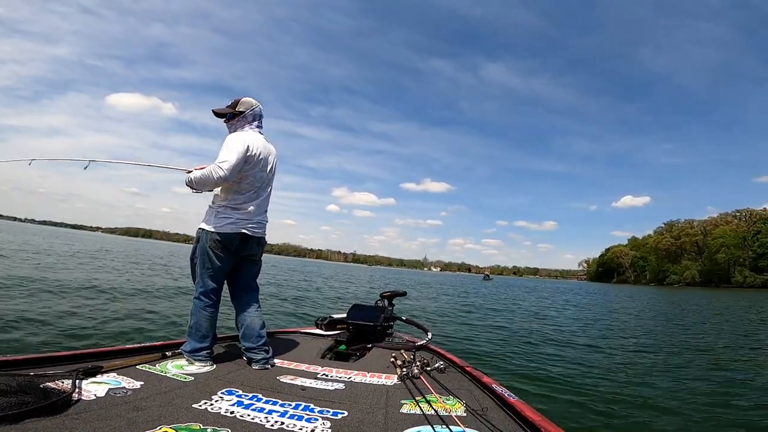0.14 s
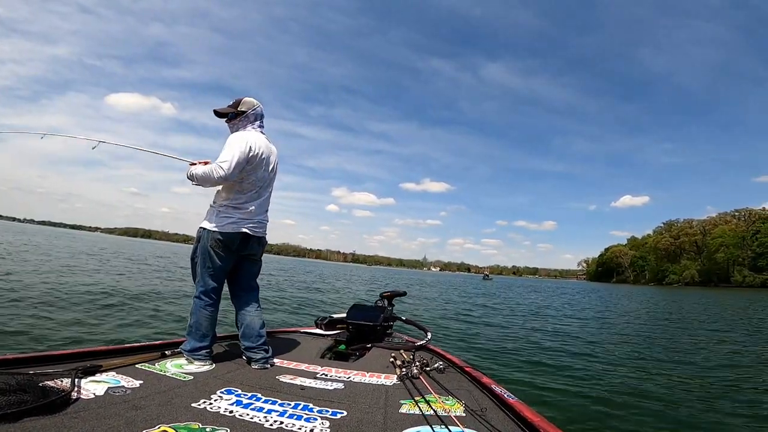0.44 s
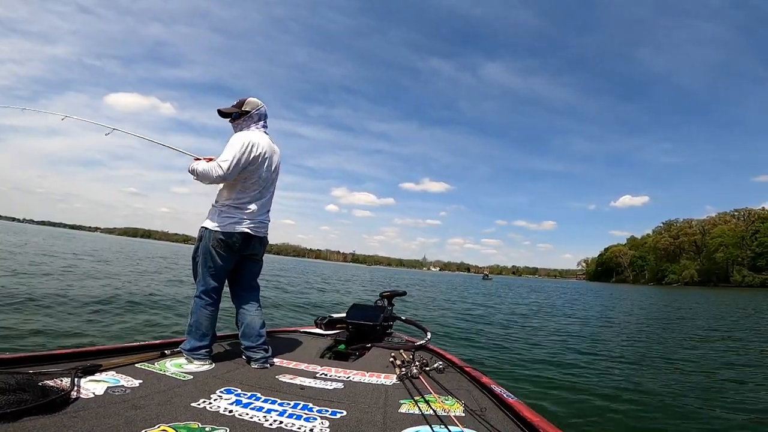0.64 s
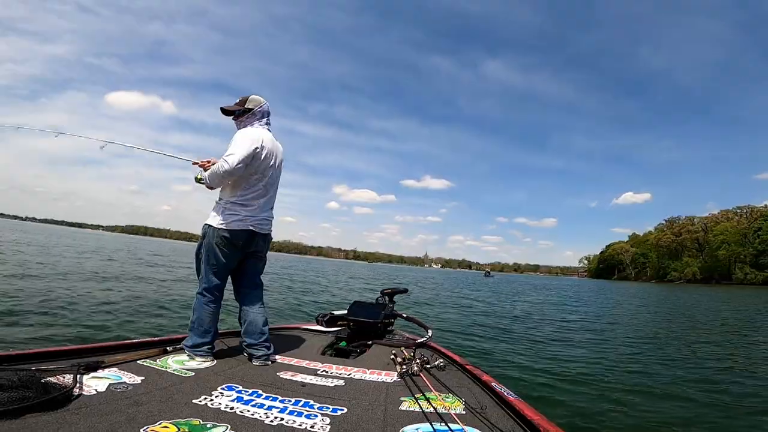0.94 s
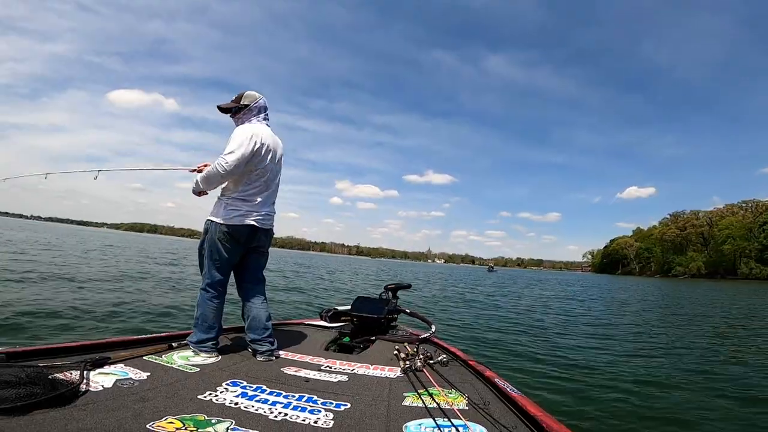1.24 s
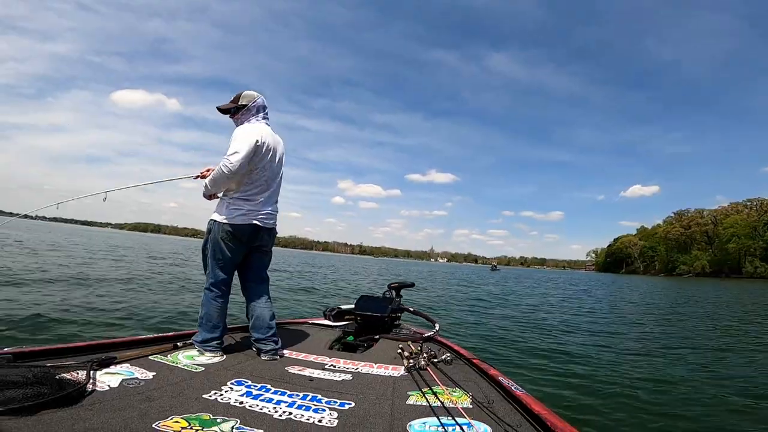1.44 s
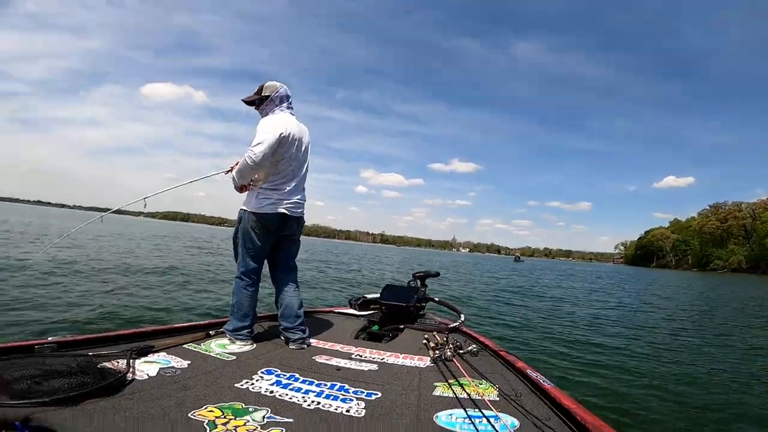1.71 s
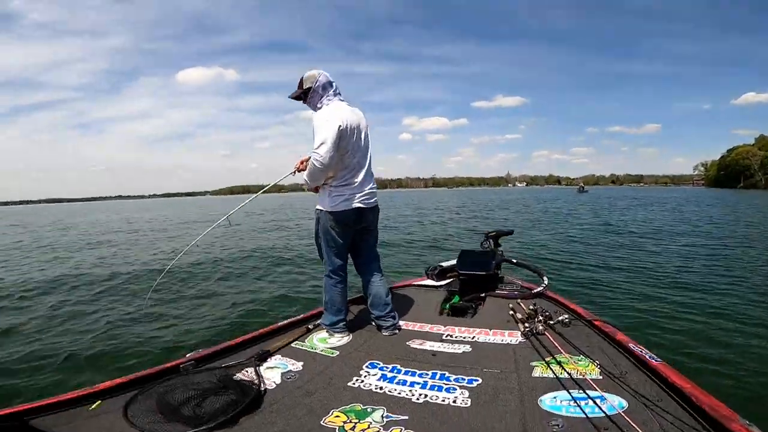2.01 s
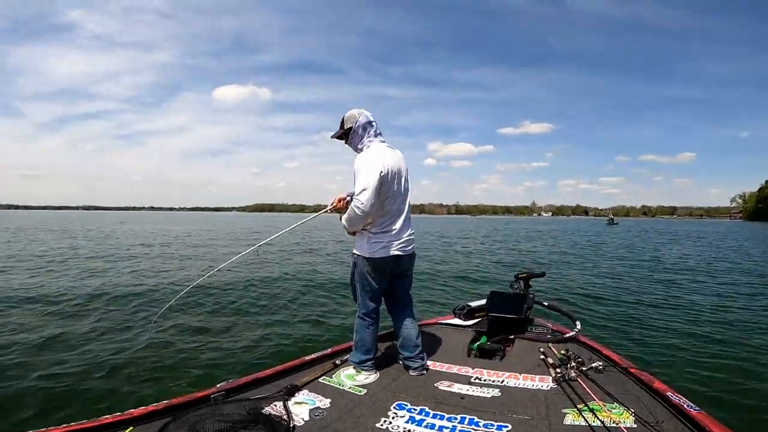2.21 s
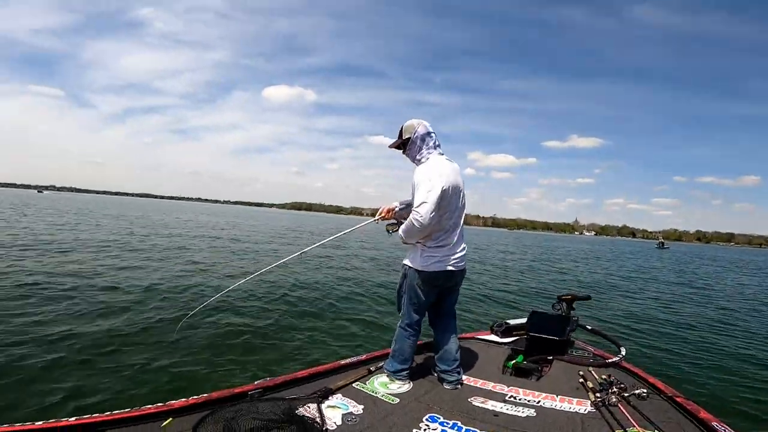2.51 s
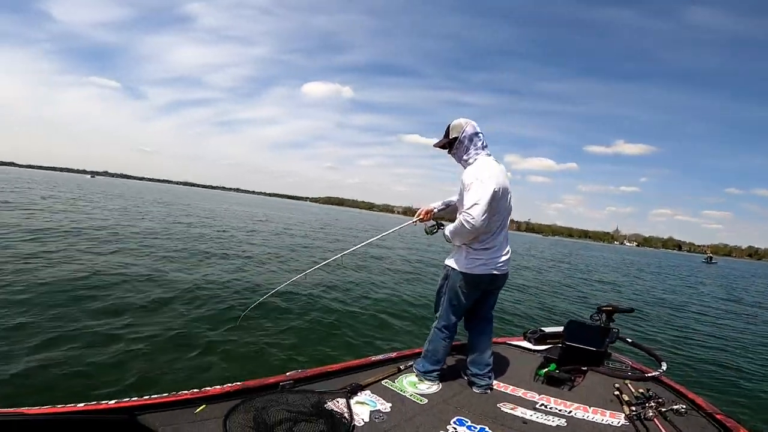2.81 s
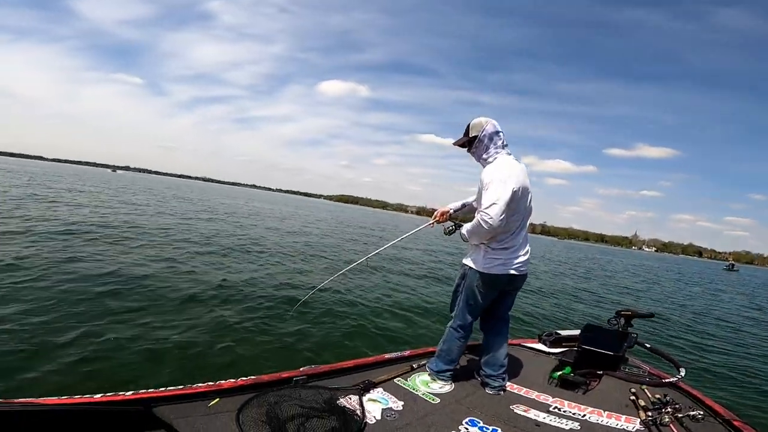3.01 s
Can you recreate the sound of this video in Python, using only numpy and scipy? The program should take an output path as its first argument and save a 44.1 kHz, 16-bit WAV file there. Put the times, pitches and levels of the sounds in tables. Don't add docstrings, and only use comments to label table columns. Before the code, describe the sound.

Low electric motor hum with soft water wash, outdoors on a boat; midway, dull deck thuds and a short clattering scrape with knocks, then stronger low wind rumble on the onboard microphone.

```python
import sys
import numpy as np
from scipy import signal
from scipy.fft import rfft, irfft, next_fast_len
from scipy.io import wavfile
from scipy.ndimage import uniform_filter1d, map_coordinates

SR = 44100
rng = np.random.default_rng(int(sys.argv[2]) if len(sys.argv) > 2 else 0)


def inscribe(sig):
    pcm = np.round(np.clip(np.atleast_2d(sig).T, -1, 1) * 32767)
    wavfile.write(sys.argv[1], SR, pcm.astype(np.int16))


def volts_from_decibels(level):
    exponent = np.asarray(level, float) / 20
    return 10 ** exponent


N = 138915
SWELL_DB, PATCH_DB = 0.8, 1.5


def unit(x):
    return x / np.sqrt(np.mean(x ** 2) + 1e-20)


def along(points, hz):
    f, value = np.transpose(points)
    return np.interp(np.log(hz + 1), np.log(f + 1), value)


def curve(rows):
    return np.interp(np.arange(N) / SR, *np.transpose(rows))


def wobble(rate_hz):
    return map_coordinates(rng.standard_normal(400), [np.arange(N) * rate_hz / SR])


def filtered(x, response):
    m = next_fast_len(len(x) + 8192)
    return irfft(rfft(x, m) * response(np.fft.rfftfreq(m, 1 / SR)), m)[:len(x)]


def resonances(table):
    def response(f):
        total = 0
        for k, (hz, width, db) in enumerate(table):
            damping = 1j * f * width
            total = total + (-1) ** k * volts_from_decibels(db) * damping / (hz * hz - f * f + damping)
        return total
    return response


def rush(spectrum, patchy_db):
    z = signal.stft(rng.standard_normal(N), nperseg=512)[2]
    field = uniform_filter1d(rng.standard_normal(z.shape), size=5, axis=0)
    field = uniform_filter1d(field, size=10, axis=1)
    x = signal.istft(z * volts_from_decibels(patchy_db * unit(field)), nperseg=512)[1][:N]
    top_hz = spectrum[-1][0]
    return unit(filtered(x, lambda hz: volts_from_decibels(along(spectrum, hz) - 10 * np.log2(np.maximum(hz / top_hz, 1)))))


def add(out, start_s, x):
    out[round(start_s * SR):][:len(x)] += x


def ring(hz, t60, attack, rise=0):
    t = np.arange(SR // 5) / SR
    tone = np.sin(2 * np.pi * hz * t * (1 + rise * np.minimum(t / t60, 1)))
    return tone * volts_from_decibels(-60 * t / t60) * (1 - np.exp(-t / attack))


def swell_db(t, rise_t60, fall_t60):
    return -60 * np.where(t < 0, -t / rise_t60, t / fall_t60)


# pitch_hz, rms_db
HUM_LINES = [(139.6, -42.5), (279.7, -40)]
# time_s, gain_db
MOTOR_LOAD = [(0, -1.5), (.35, 1), (.7, 1), (.9, -2), (1.15, -2), (1.5, 0), (2.0, -4.5), (2.2, 3.5),
              (2.5, 1.5), (3.15, 1)]
# pitch_hz, width_hz, level_db
HULL_MODES = [(141.8, 21.8, -0.5), (191, 21.6, 0.5), (261.6, 43.3, -1.5), (341.3, 24.1, 0), (403, 41, -8.5)]
# pitch_hz, width_hz, level_db
HULL_PANELS = [
    [(772.5, 54, -9), (1024, 170, -17), (1270, 150, -18), (1630, 220, -25.5)],
    [(597, 110, -11), (860, 240, -18.5), (1316, 250, -19.5)],
]


def motor():
    drift, sway_db, brush_share, hull_db = 0.0007, 1, 0.21, -34
    swing_s, swing_lasts_s = 1.85, 0.23
    turn = 2 * np.pi * np.cumsum(1 + drift * wobble(2.2)) / SR
    lines = np.zeros(N)
    for hz, db in HUM_LINES:
        level_db = db + curve(MOTOR_LOAD) + sway_db * wobble(5.1)
        lines += np.sqrt(2) * volts_from_decibels(level_db) * np.sin(hz * turn)
    brush = rng.standard_normal(N) * (1 + brush_share * np.sin(HUM_LINES[0][0] * turn))

    def through_hull(panels):
        return filtered(brush, lambda f: resonances(HULL_MODES + panels)(f) / (1 + (f / 2200) ** 4))

    before, after = [through_hull(panels) for panels in HULL_PANELS]
    swung = np.clip((np.arange(N) / SR - swing_s) / swing_lasts_s + 0.5, 0, 1)
    hull = unit((1 - swung) * before + swung * after)
    return lines + volts_from_decibels(hull_db + SWELL_DB * wobble(4.28)) * hull


# peak_s, rise_t60_s, fall_t60_s, level_db, tilt_db_per_octave
RATTLE_EVENTS = [(1.754, .003, 0.13, -39, -2.5), (1.77, .03, 0.23, -44, -8),
                 (1.784, 0.047, .04, -41.5, 14.5), (1.802, 0.034, 0.073, -38, -25),
                 (1.851, .006, .04, -39, -14), (1.866, 0.017, 0.021, -34.5, -12),
                 (1.878, .006, 0.028, -44, -5), (1.926, 0.011, .04, -34, -16.5),
                 (1.992, 0.047, 0.06, -27.5, -6), (2.029, 0.011, .03, -22.5, -2.5),
                 (2.116, 0.023, 0.032, -22, -13), (2.387, .004, .03, -45, -22.5),
                 (2.567, .004, .03, -45, -28), (2.717, 0.0071, .03, -44.5, -11), (2.785, .02, .06, -45, -6),
                 (2.809, .004, .03, -39.5, -9), (2.834, .003, .02, -44.5, -5),
                 (2.847, .004, .08, -40.5, -12), (3.07, 0.027, .04, -40.5, -15),
                 (3.093, .009, 0.048, -44, -10)]
# pitch_hz, width_hz, level_db
MOUNT_MODES = [(1211, 90, -5), (1814, 110, -3), (2500, 150, -4), (3321, 200, 0), (4188, 280, -3),
               (4900, 260, -4),
               (6150, 790, -11), (8600, 1500, -20.5), (11000, 2400, -24), (13240, 1100, -30)]


def mount_rattle():
    contacts_per_s, contact_db = 2500, 4
    out, t = np.zeros(N + SR), np.arange(-SR // 20, SR // 8) / SR
    for peak_s, rise, fall, db, tilt_db in RATTLE_EVENTS:
        hits = rng.random(len(t)) < contacts_per_s / SR
        grit = hits * rng.standard_normal(len(t)) * volts_from_decibels(contact_db * rng.standard_normal(len(t)))
        scrape = 0.5 * rng.standard_normal(len(t))

        def colour(f):
            return resonances(MOUNT_MODES)(f) * volts_from_decibels(tilt_db * np.log2((f + 3300) / 6600))

        burst = filtered((unit(grit) + scrape) * volts_from_decibels(swell_db(t, rise, fall)), colour)
        peak_rms = np.sqrt(uniform_filter1d(burst ** 2, size=200).max())
        add(out, peak_s + t[0], volts_from_decibels(db - 5.5) * burst / peak_rms)
    return out[:N]


# peak_s, rise_t60_s, fall_t60_s, level_db
KNOCK_EVENTS = [
    (1.993, 0.016, 0.032, -32),
    (2.0293, 0.042, 0.044, -37),
    (2.116, 0.028, 0.015, -27.5),
]
# pitch_hz, level_db
KNOCK_MODES = [
    [(1210, 5), (1970, 4.5), (2422, -12), (2923, -5), (3418, -8), (3919, -17), (4414, -2), (4974, -8),
     (6045, -12)],
    [(1800, -1), (2500, -2), (3365, -5), (3849, -12), (4264, -21), (4996, -9), (5507, -11.5), (6099, -13),
     (6584, -17), (7553, -11), (8344, -15)],
    [(1217, 0), (1820, -7), (2013, -4), (2519, -5.5), (3327, -3), (3521, 0), (4183, -19), (4899, -17.5),
     (5932, -17)],
]
# start_s, peak_db, pitch_hz, t60_s
CLINK_EVENTS = [(1.751, -50, 8500, .03), (1.753, -49, 4950, 0.047), (1.788, -54, 9800, 0.084),
                (1.79, -65, 12000, .08), (1.782, -59, 14430, 0.05), (1.79, -29.5, 2020, 0.045),
                (1.8, -63, 8060, 0.07)]


def mount_knocks():
    out, t = np.zeros(N + SR), np.arange(-SR // 20, SR // 8) / SR
    for (peak_s, rise, fall, db), modes in zip(KNOCK_EVENTS, KNOCK_MODES):
        tone = sum(volts_from_decibels(level) * np.sin(2 * np.pi * (hz * t + rng.random())) for hz, level in modes)
        add(out, peak_s + t[0], volts_from_decibels(db + swell_db(t, rise, fall)) * tone)
    for start_s, db, hz, t60 in CLINK_EVENTS:
        add(out, start_s, volts_from_decibels(db) * ring(hz, t60, attack=0.00082))
    return out[:N]


# start_s, peak_db, pitch_hz, t60_s
THUD_EVENTS = [(1.655, -15.5, 102, 0.17), (1.668, -11.5, 165.4, 0.16), (1.77, -14, 291, 0.066),
               (1.788, -6.5, 123, 0.065), (1.995, -16, 424, 0.091), (2.035, -14.5, 189, 0.063),
               (2.316, -9, 60.4, 0.11), (2.334, -6, 46, 0.064), (2.1, -14.5, 85, 0.077),
               (2.223, -20.5, 112, 0.024), (2.987, -15.5, 49.3, 0.12), (2.108, -27.5, 434, 0.12)]


def deck_thuds():
    out = np.zeros(N + SR)
    for start_s, db, hz, t60 in THUD_EVENTS:
        add(out, start_s, -volts_from_decibels(db) * ring(hz, t60, attack=0.34 / hz))
    return out[:N]


# start_s, peak_db, pitch_hz, crack_hz, crack_db, t60_s
TICK_EVENTS = [
    (0.3273, -46, 5930, 8800, -12.5, 0.0076),
    (0.585, -46, 5830, 8700, -9.5, 0.0072),
    (0.705, -50, 4950, 9660, 2, 0.027),
    (1.079, -72, 4555, 9150, 13.5, 0.012),
    (2.072, -60.5, 4080, 7900, 8, 0.019),
]


def reel_ticks():
    rebound_s, rebound_db, crack_width, crack_t60_s = 0.0011, 7.5, 0.12, 0.017
    out, t = np.zeros(N + SR), np.arange(SR // 5) / SR
    for start_s, db, hz, crack_hz, crack_db, t60 in TICK_EVENTS:
        crack_mode = resonances([(crack_hz, crack_width * crack_hz, 0)])
        for late_s, gain_db in [(0, 0), (rebound_s, rebound_db)]:
            crack = filtered(rng.standard_normal(len(t)) * volts_from_decibels(-60 * t / crack_t60_s), crack_mode)
            ping = ring(hz, t60, attack=0.00024)
            tick = ping + volts_from_decibels(crack_db) * crack / np.abs(crack).max()
            add(out, start_s + late_s, volts_from_decibels(db + gain_db) * tick)
    return out[:N]


def bubbles():
    count, rate_per_s, length = 1300, 400, 1024
    pitch_hz, pitch_spread, life_cycles, size_db = 950, 0.4, 6, 2
    when, size, pitch = rng.random(count), rng.exponential(1, count), rng.standard_normal(count)
    hz = (pitch_hz * np.exp(pitch_spread * np.clip(pitch, -2, 1.5)))[:, None]
    t = np.arange(length) / SR
    age = t * hz / life_cycles
    tone = np.sin(2 * np.pi * hz * t * (1 + 0.066 * age))
    grains = volts_from_decibels(size_db * np.minimum(size, 2))[:, None] * tone * age * np.exp(-3 * age)
    start = (when * count / rate_per_s * SR).astype(int)[:, None] + np.arange(length)
    return unit(np.bincount(start.ravel(), grains.ravel(), N)[:N])


# time_s, level_db
WASH_FLOW = [(0, -45), (.55, -44), (1.0, -39), (1.42, -42.5), (1.47, -35), (1.55, -42), (1.85, -35),
             (2.13, -41.5), (2.38, -48.5), (2.55, -44), (2.74, -41), (3.15, -51)]
# pitch_hz, level_db_per_hz
WASH_SPECTRUM = [(200, -27.5), (350, -5), (500, 0), (660, -10), (800, -5), (1260, -5.5), (1700, -22),
                 (2400, -34)]
# time_s, level_db
SPRAY_FLOW = [(0, -64.5), (.45, -65.5), (.9, -64.5), (1.45, -62), (1.7, -65.5), (1.77, -52.5), (1.95, -57),
              (2.14, -55.5), (2.2, -60.5), (2.6, -62), (2.8, -55.5), (2.95, -57), (3.15, -61.5)]
# pitch_hz, level_db_per_hz
SPRAY_SPECTRUM = [(900, -27), (1500, 9), (2600, 3.5), (4400, -5.5), (6500, -9.5), (9000, -17.5),
                  (16000, -32.5)]
# start_s, peak_db, pitch_hz, t60_s
PLOP_EVENTS = [(.312, -19.5, 852, 0.038), (1.431, -13.5, 890, 0.024), (1.46, -29, 793, 0.12),
               (1.795, -19.5, 500, 0.045), (1.7, -19.5, 640, .05), (1.876, -12, 623, 0.028),
               (1.625, -23.5, 1300, 0.039), (1.1, -24, 1140, 0.022), (0.72, -28.5, 790, 0.066),
               (2.037, -16.5, 787, 0.034), (1.2, -21.5, 340, 0.1), (2.2, -23, 850, 0.053),
               (1.99, -14.5, 650, 0.034), (2.116, -20, 660, 0.058), (2.712, -9, 602, 0.021)]


def water():
    bubble_db = -3
    plops = np.zeros(N + SR)
    for start_s, db, hz, t60 in PLOP_EVENTS:
        add(plops, start_s, volts_from_decibels(db) * ring(hz, t60, attack=0.0051, rise=0.062))
    wash_gain = volts_from_decibels(curve(WASH_FLOW) - 3.5 + SWELL_DB * wobble(8.62))
    wash = wash_gain * (rush(WASH_SPECTRUM, PATCH_DB) + volts_from_decibels(bubble_db) * bubbles())
    spray_gain = volts_from_decibels(curve(SPRAY_FLOW) + 4.5 + 0.92 * wobble(25.18))
    return wash + spray_gain * rush(SPRAY_SPECTRUM, PATCH_DB) + plops[:N]


# time_s, level_db
GUSTS = [(0, -32.5), (.13, -49), (.3, -45), (.59, -46), (.91, -40), (1.1, -50), (1.2, -40), (1.6, -40.5),
         (1.84, -31.5), (2.03, -27.5), (2.18, -33), (2.3, -24.5), (2.41, -29), (2.6, -30), (2.75, -31.5),
         (3.01, -27), (3.05, -37.5), (3.15, -44)]
# pitch_hz, level_db_per_hz
WIND_SPECTRUM = [(8.8, -11.5), (15, 2), (65, 2), (197, -10), (275, -9), (425, -28.5), (700, -22.5),
                 (910, -66.5), (1540, -120)]


def wind():
    lump_db = 1.5
    air = rush(WIND_SPECTRUM, PATCH_DB)
    power = uniform_filter1d(air ** 2, size=2200)
    even = air / (np.abs(power) + 0.05) ** 0.28
    return volts_from_decibels(curve(GUSTS) + 2.5) * unit(volts_from_decibels(lump_db * wobble(16)) * even)


# pitch_hz, level_db_per_hz
EDDY_SPECTRUM = [(120, -47), (200, -18), (374, -12), (727, -9.5), (1580, -15.5), (2420, -38.5),
                 (5200, -62.5)]


def eddies():
    return volts_from_decibels(curve(GUSTS) - 32 + 3 * wobble(20)) * rush(EDDY_SPECTRUM, 2 * PATCH_DB)


# pitch_hz, level_db
SIDE_SPREAD = [(100, -89), (300, -59), (700, -36), (1500, -22.5), (3000, -21), (6000, -15), (10000, -8.5)]


def scene():
    lean = -0.55
    mid = motor() + mount_rattle() + mount_knocks() + deck_thuds() + reel_ticks() + water() + wind()
    z = signal.stft(mid, nperseg=256)[2]
    random_phase = np.exp(2j * np.pi * rng.random(z.shape))
    apart = signal.istft(z * random_phase, nperseg=256)[1][:N]
    side = lean * mid + np.sqrt(1 - lean ** 2) * apart
    side = filtered(side, lambda hz: volts_from_decibels(along(SIDE_SPREAD, hz))) + eddies()
    return np.array([mid + side, mid - side])


# pitch_hz, level_db re block loudness
MID_FLOOR = [(3000, -80.5), (4500, -64.5), (6000, -57.5), (9000, -64), (14000, -63)]
# pitch_hz, level_db re block loudness
SIDE_FLOOR = [(200, -31.5), (600, -47.5), (1500, -45), (3000, -72.5), (6000, -73), (14000, -69.5)]
FLOOR_GROWTH = [1.2, .6]
FLOOR_SCATTER = [2.5, 3]


def drop_faint_bands(mid_side):
    lead, size = 968, 2048
    window = signal.windows.kaiser_bessel_derived(size, 4 * np.pi)
    hz, _, z = signal.stft(np.pad(mid_side, ((0, 0), (lead, 0))), SR, window=window, nperseg=size)
    power = np.abs(z) ** 2
    centre = np.minimum(np.arange(1025) // 24 * 24 + 12, 1024)
    mid_power = uniform_filter1d(power[0], size=24, axis=0)[centre]
    side_power = uniform_filter1d(power[1], size=5, axis=0)
    band_db = 10 * np.log10(np.abs([mid_power, side_power]) + 1e-20)
    loud_db = 10 * np.log10(np.sum(power[0], axis=0) + 1e-20)
    scatter = np.repeat(rng.standard_normal((2, 129, z.shape[2])), repeats=8, axis=1)[:, :len(hz)]
    floor = np.array([along(MID_FLOOR, hz), along(SIDE_FLOOR, hz)])[..., None]
    floor = floor + np.c_[FLOOR_GROWTH][..., None] * (loud_db + 35.5) - 36.5
    floor = floor + np.c_[FLOOR_SCATTER][..., None] * scatter
    margin = band_db - floor
    best_above = np.maximum.accumulate(margin[0, ::-1])[::-1]
    margin[0] = np.maximum(margin[0], best_above - 4)
    gate = 1 / (1 + volts_from_decibels(np.clip(-8 * margin, -80, 80)))
    return signal.istft(z * gate, SR, window=window, nperseg=size)[1][:, lead:lead + N]


def low_pass(x):
    return signal.sosfilt(signal.butter(12, 14250, fs=SR, output="sos"), x)


def record(dry):
    mid_side = np.array([dry[0] + dry[1], dry[0] - dry[1]]) / 2
    mid, side = drop_faint_bands(mid_side)
    fade = np.minimum((N - np.arange(N)) / 128, 1)
    return low_pass(fade * np.array([mid + side, mid - side]))


dry = scene()
out = record(dry)
inscribe(out)
```